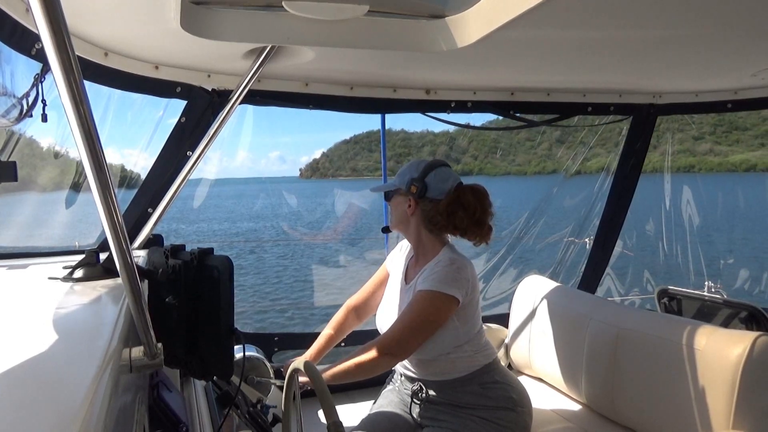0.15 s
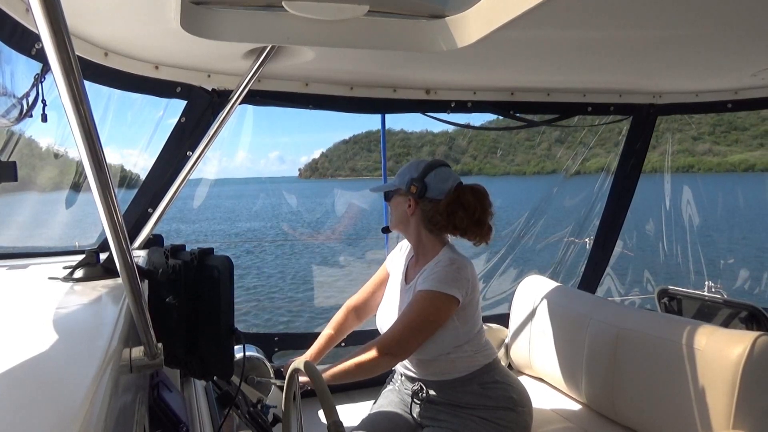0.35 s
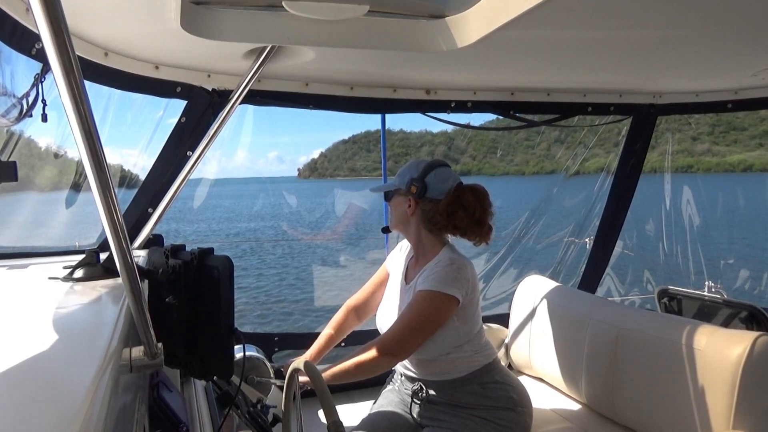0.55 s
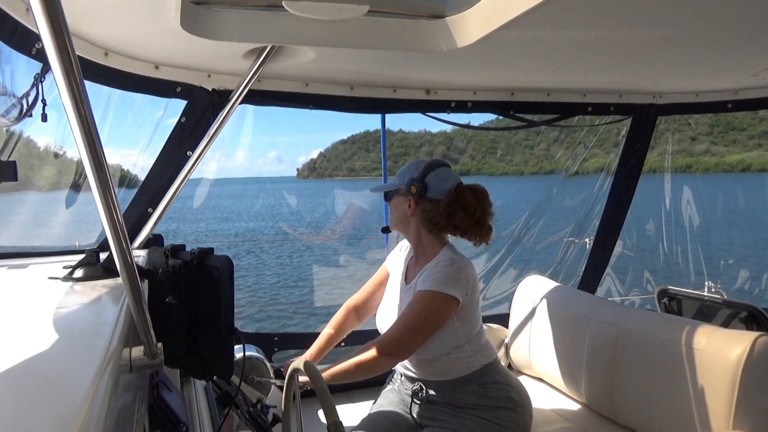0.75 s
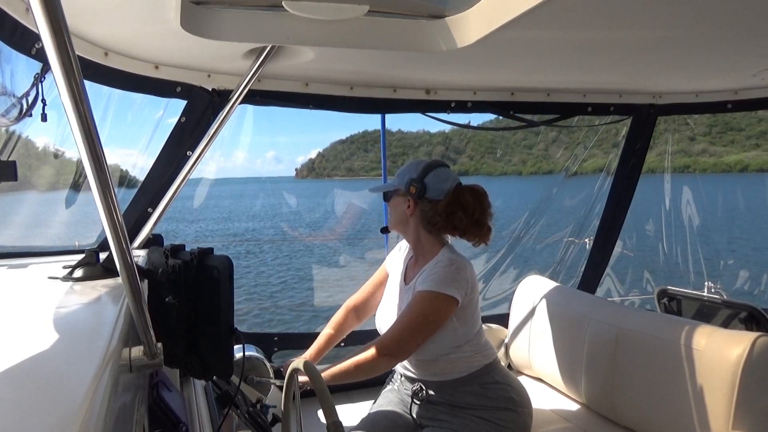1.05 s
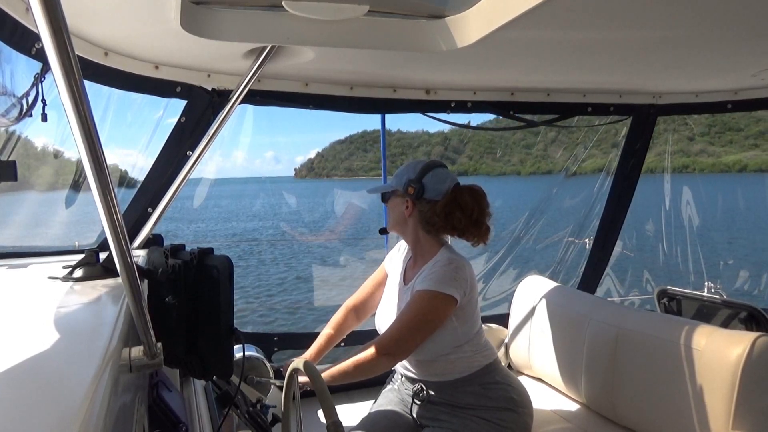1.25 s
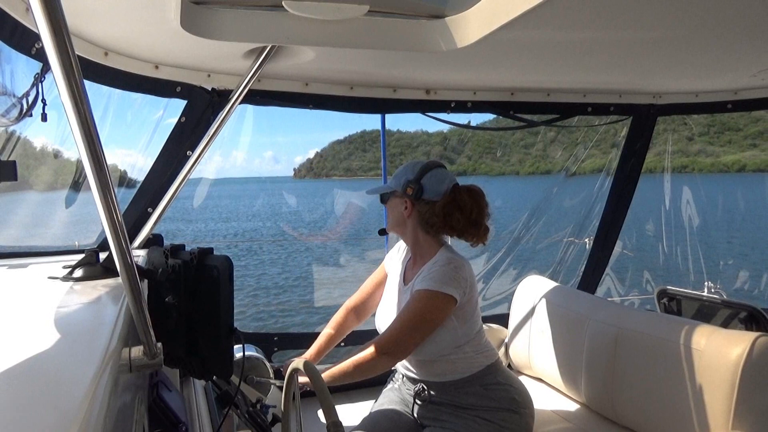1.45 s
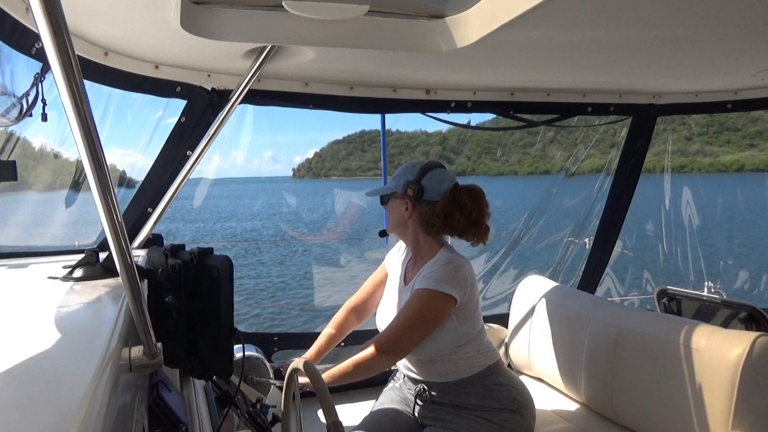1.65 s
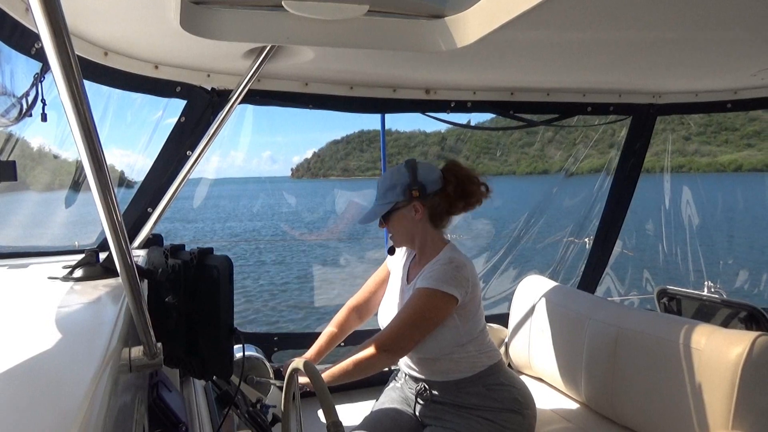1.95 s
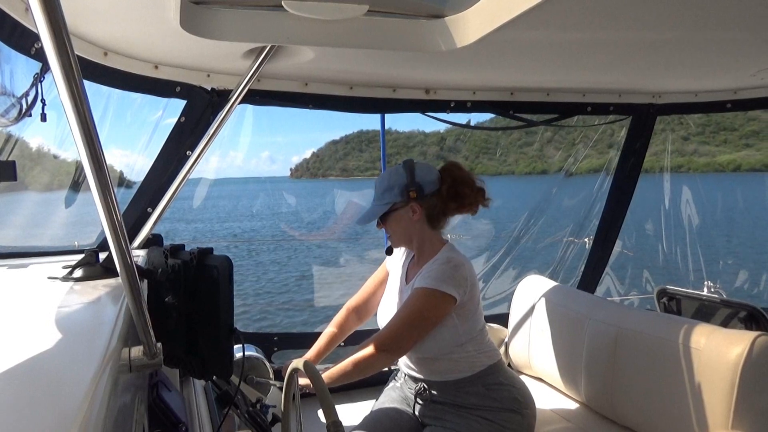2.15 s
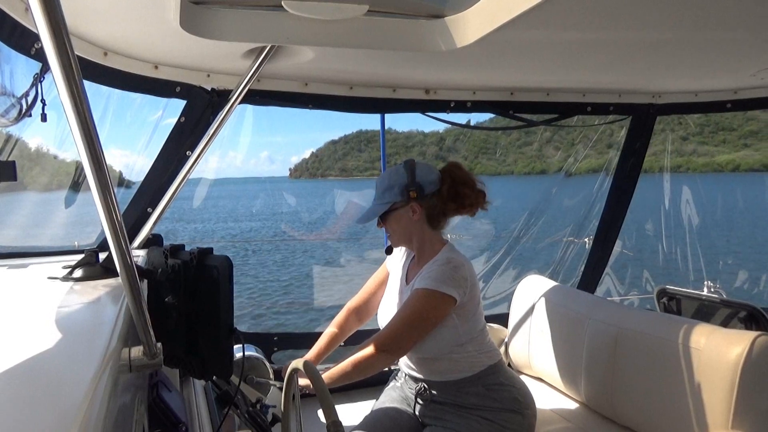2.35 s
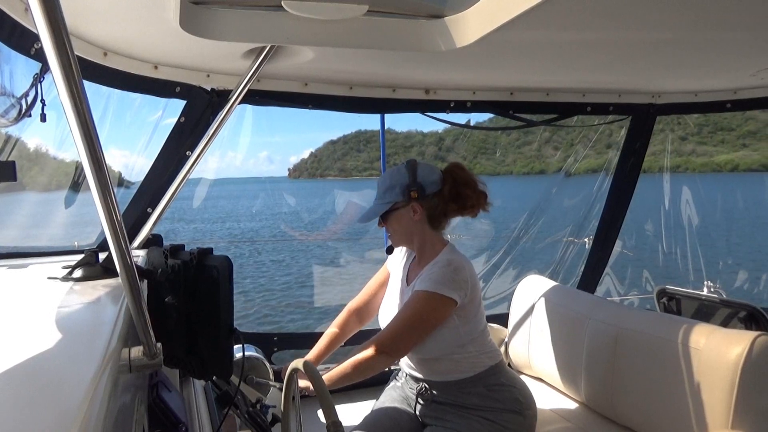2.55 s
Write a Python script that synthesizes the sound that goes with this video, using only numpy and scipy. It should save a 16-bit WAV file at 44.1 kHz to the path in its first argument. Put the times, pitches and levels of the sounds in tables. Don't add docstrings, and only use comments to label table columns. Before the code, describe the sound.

Inside an enclosed boat bridge, a microphone picks up steady diesel hum that throbs and surges, with light clatter, water wash and dull hull thuds, before one engine speeds up a little at the end.

```python
import sys
import numpy as np
from scipy import signal
from scipy.fft import rfft, irfft
from scipy.io import wavfile
from scipy.ndimage import uniform_filter1d

SR = 44100
rng = np.random.default_rng(int(sys.argv[2]) if len(sys.argv) > 2 else 0)


def level_to_linear(level):
    exponent = np.asarray(level, float) / 20
    return 10 ** exponent


def int16_out(signal):
    q = np.round(np.clip(np.atleast_2d(signal).T, -1, 1) * 32767)
    wavfile.write(sys.argv[1], SR, q.astype(np.int16))


N = 119070
T = np.arange(N) / SR
HZ = np.fft.rfftfreq(N, 1 / SR)


def evened(x):
    return x / np.sqrt(np.mean(x ** 2) + 1e-20)


def read(points, hz):
    f, value = np.transpose(points)
    return np.interp(np.log(hz + 1), np.log(f + 1), value)


def slow(top_hz):
    return evened(irfft(rfft(rng.standard_normal(N)) / (1 + (HZ / top_hz) ** 4), N))


def drift(db_per_s):
    return level_to_linear(db_per_s * (T - T.mean()))


def peak(hz, width):
    return 1 / (1 + 2j * (HZ - hz) / width) ** 2


def ring(hz, width):
    return evened(irfft(rfft(rng.standard_normal(N)) * peak(hz, width), N))


def singing(parts_hz, parts):
    modes = [level_to_linear(db) * np.sqrt(width) * ring(hz, width) for hz, (width, db) in zip(parts_hz, parts)]
    return evened(sum(modes))


def turbulence(spectrum, patchy_db):
    frames, hz = N // 256 + 5, np.fft.rfftfreq(1024, 1 / SR)
    real, imaginary, patches = rng.standard_normal((frames, 513, 3)).T
    patches = uniform_filter1d(patches, size=10, axis=0)
    patches = evened(uniform_filter1d(patches, size=12, axis=1))
    level_db = read(spectrum, hz)[:, None] + patchy_db * patches
    z = (real + 1j * imaginary) * level_to_linear(level_db)
    return evened(signal.istft(z, nperseg=1024, noverlap=768)[1][:N])


# t/s, speed/(turns per s)
PORT_SPEED = [
    (0, 16.069),
    (2.24, 16.069),
    (2.52, 17.4),
    (2.7, 17.45),
]


def port_shaft():
    return np.cumsum(np.interp(T, *np.transpose(PORT_SPEED))) / SR - .445


def starboard_shaft():
    return 17.335 * T - .35


def order_tones(turns, orders, firing_db=0):
    firing_order, waver, waver_hz = 6, 0.28, 7.6
    out = np.zeros(N)
    for order, db in orders:
        if order == firing_order:
            db = db + firing_db
        size = np.sqrt(2) * level_to_linear(db) * (1 + waver * slow(waver_hz))
        out += size * np.cos(2 * np.pi * (order * turns + rng.random()))
    return out


# shaft order, level/dB
PORT_ORDERS = [(2, -41), (3, -42), (4, -39.5), (6, -45), (7, -35), (8, -43), (9, -27.5), (10, -48.5),
               (11, -43), (12, -44), (13, -42.5), (14, -41), (16, -47.5), (17, -44), (22, -43), (28, -43)]


def port_drone(turns):
    return order_tones(turns, PORT_ORDERS)


# shaft order, level/dB
STARBOARD_ORDERS = [(2, -96), (3, -47.5), (6, -26), (7, -43.0), (8, -49), (9, -28), (10, -37), (11, -65.5),
                    (12, -49), (13, -45.5), (15, -45.5), (17, -41), (18, -36), (20, -40), (21, -40),
                    (22, -45.6), (26, -57.5)]
# t/s, level/dB
FIRING_SWELL = [(0, -20), (.25, -4), (.45, -6), (.75, 6), (.9, 1.5), (1.15, 0), (1.45, 0.5), (1.65, 9),
                (1.82, 3.5), (1.9, -8), (2.1, 1), (2.2, 5.5), (2.5, 8.5), (2.62, 2), (2.7, 7.5)]


def starboard_drone(turns):
    return order_tones(turns, STARBOARD_ORDERS, np.interp(T, *np.transpose(FIRING_SWELL)))


def taps(turns, parts_hz, width, level_db, cylinders_db):
    jitter_s, bounce_s, bounce_gain = .0002, .0009, 0.36
    beat, z = np.arange(300), 0
    strength = level_to_linear(np.resize(cylinders_db, 300))
    for hz in parts_hz:
        late, gap = rng.standard_normal((2, 300))
        at = np.interp(beat / 6 - 1, turns, T, left=9, right=9) + jitter_s * late
        bounce_at = at + bounce_s * (1 + 0.33 * gap)
        clicks = np.zeros(N)
        for when, share in ((at, 1), (bounce_at, bounce_gain)):
            inside = (when > 0) & (when < T[-1])
            clicks[(when[inside] * SR).astype(int)] += share * strength[inside]
        z = z + rfft(clicks) * peak(hz, width)
    return level_to_linear(level_db) * evened(irfft(z, N))


PUMP_HZ = [9420, 9650, 9870, 10300, 10520, 11250, 11500, 11750]
RAIL_HZ = [7251, 7500, 7740, 8350, 8646, 8709, 8889, 9420]
COVER_HZ = [4880, 5560, 6050, 6349, 6429, 6621, 6750]
SNAP_HZ = [12200]
# bandwidth/Hz, level/dB, levels of six cylinders in firing order/dB
PUMP = (190, -55.5, [2, -3.5, -1, -4.5, -5, -11])
RAIL = (125, -57.5, [2.5, -8, 0, -8, 2, -9])
COVER = (105, -55, [1, 6, -1, 0, -4, -1])
SNAP = (2800, -68, [2, 1, -10, -7, -13, -7])


def port_ticks(turns):
    fuel = taps(turns, PUMP_HZ, *PUMP) + taps(turns, RAIL_HZ, *RAIL)
    return fuel + taps(turns, COVER_HZ, *COVER) + taps(turns, SNAP_HZ, *SNAP)


BELL_HZ = [5290, 5310]
PIPE_HZ = [7153, 7251, 8709]
# bandwidth/Hz, level/dB, levels of six cylinders in firing order/dB
BELL = (130., -55, [0, -7, -8, -7, -5, -6])
PIPE = (100, -59, [6, -11, -19, 2, -7, 8])


def starboard_ticks(turns):
    return drift(-3.5) * (taps(turns, BELL_HZ, *BELL) + taps(turns, PIPE_HZ, *PIPE))


# f/Hz, bandwidth/Hz, level/dB, change/(dB per s)
HATCH = (2742, 900, -54.5, 1)


def hatch_noise():
    hz, width, db, db_per_s = HATCH
    return level_to_linear(db) * drift(db_per_s) * ring(hz, width)


SINGING_HZ = [2680, 3067, 3540, 4318, 5190, 5305, 5737, 6349, 6429, 6621, 7251, 8709, 8889, 11800]
# bandwidth/Hz, level/dB
SINGING = [(240, -12), (14, 1), (78, -7), (14, -4), (24, -2), (36, 1), (30, -3), (24, -6), (14, -2),
           (20, -7), (24, -1), (16, -2), (20, -8), (70, -11)]


def metal_rattle():
    return level_to_linear(-53.5) * drift(-0.5) * singing(SINGING_HZ, SINGING)


HULL_HZ = [118, 195, 410, 565, 680, 728, 1127, 1345, 1500, 1605, 1700]
# bandwidth/Hz, level/dB
HULL = [(55.6, -2.5), (43, -8.5), (50, -20.5), (12, -12.5), (50, -22), (18.2, -16), (21, -26.5),
        (30, -28.5), (77, -27), (50, -23.5), (90, -32.5)]


def hull_resonance():
    return level_to_linear(-28.5) * singing(HULL_HZ, HULL)


# f/Hz, level/(dB per Hz)
ROAR = [(12, -60), (20, -32), (137, -4), (367, -11.5), (509, -22), (693, -21), (1040, -32.5), (1590, -33.5),
        (2000, -50), (2600, -67), (4400, -120)]


def stern_roar():
    return level_to_linear(-25) * turbulence(ROAR, patchy_db=1.5)


# f/Hz, level/(dB per Hz)
HISS = [(1060, -17), (1800, -0.5), (2700, -1.5), (4050, -6), (7630, -8), (12300, -10.5), (12800, -19),
        (16200, -23)]


def water_hiss():
    return level_to_linear(-45.5) * turbulence(HISS, patchy_db=1.22)


# t/s, level/dB, f/Hz
SLAPS = [
    (0.295, -15, 300),
    (0.417, -11, 128),
    (1.882, -9.5, 153),
    (1.966, -6.5, 137),
    (2.58, -11, 192),
]


def slaps():
    peak_s = 0.0043
    out = np.zeros(N)
    for start, db, hz in SLAPS:
        u = np.maximum(T - start, 0)
        envelope = np.e * u / peak_s * np.exp(-u / peak_s)
        out -= level_to_linear(db) * envelope * np.sin(2 * np.pi * hz * u)
    return out


# t/s, length/s, level/dB, f/Hz, bandwidth/Hz
SPURT = (2.668, .022, -44, 9500, 7000)


def spurt():
    start, length, db, hz, width = SPURT
    u = np.maximum(T - start, 0)
    shape = np.minimum(u / .002, 1) * np.exp(-(u / length) ** 2)
    return level_to_linear(db) * shape * ring(hz, width)


# f/Hz, level/dB
LEAN = [(40, -0.1), (90, 1), (200, 0.35), (380, -.5), (950, -1.4), (2380, 0), (5980, .5), (11500, 1)]
# f/Hz, level/dB
WIDTH = [(60, -33), (300, -25), (1550, -18.5), (1800, -55), (4900, -45), (5250, -16.5), (9500, -14.5),
         (11600, -43)]


def stereo(mid):
    z, lean = rfft(mid), level_to_linear(read(LEAN, HZ) / 2)
    side = rfft(np.roll(mid, N // 3)) * level_to_linear(read(WIDTH, HZ) - 3.0)
    return irfft(np.array([z * lean + side, z / lean - side]), N)


def scene():
    port, starboard = port_shaft(), starboard_shaft()
    mid = port_drone(port) + starboard_drone(starboard)
    mid += port_ticks(port) + starboard_ticks(starboard)
    mid += hatch_noise() + metal_rattle() + hull_resonance()
    mid += stern_roar() + water_hiss()
    mid += slaps() + spurt()
    return stereo(mid)


def roll_off(x):
    return signal.sosfilt(signal.butter(12, 16380, fs=SR, output="sos"), x)


def record(dry):
    low_cut = signal.butter(3, 33, "high", fs=SR, output="sos")
    cut = signal.sosfilt(low_cut, dry)
    mid = cut.mean(0)
    z = signal.stft((cut[0] - cut[1]) / 2, nperseg=2048)[2]
    patch = uniform_filter1d(abs(z), size=16, axis=0)
    z = z * (patch > 0.88 * patch.mean(1, keepdims=True))
    side = signal.istft(z, nperseg=2048)[1][:N]
    return roll_off(np.array([mid + side, mid - side]))


dry = scene()
out = record(dry)
int16_out(out)
```